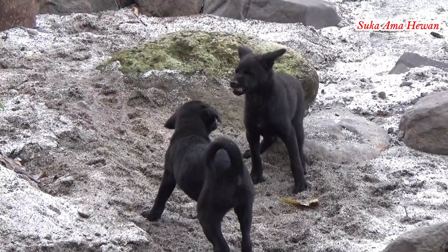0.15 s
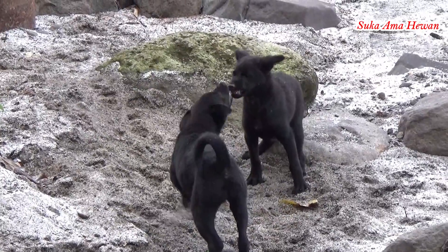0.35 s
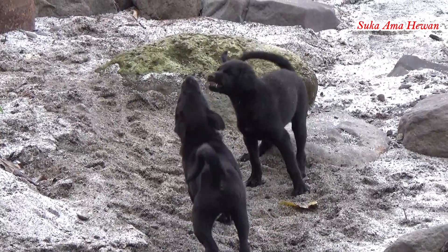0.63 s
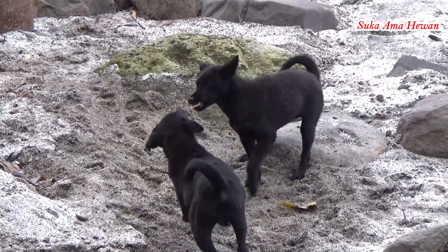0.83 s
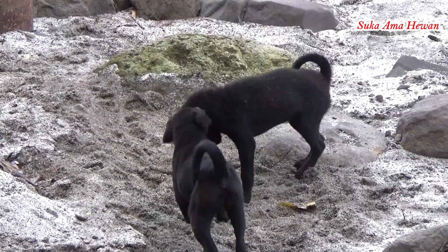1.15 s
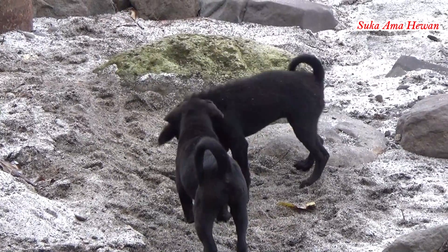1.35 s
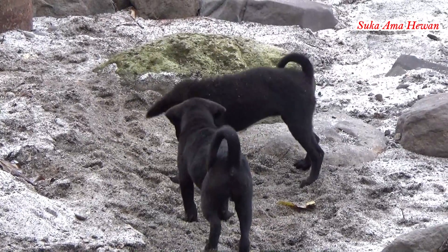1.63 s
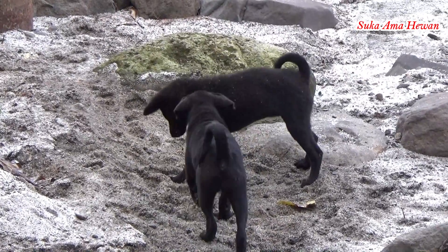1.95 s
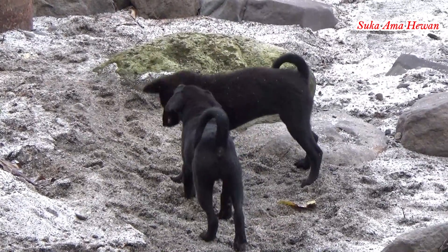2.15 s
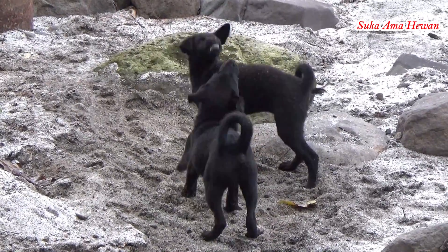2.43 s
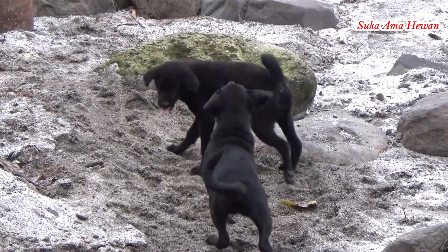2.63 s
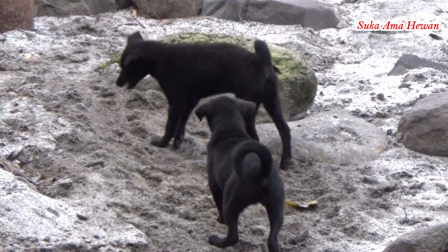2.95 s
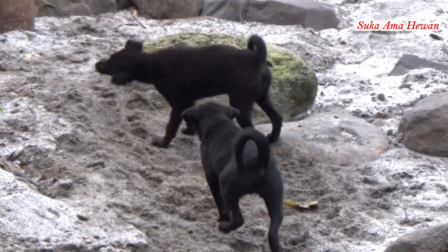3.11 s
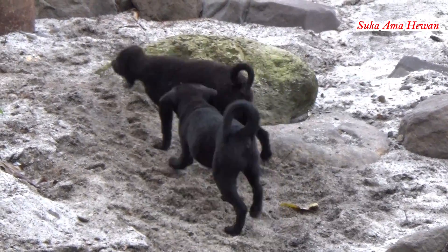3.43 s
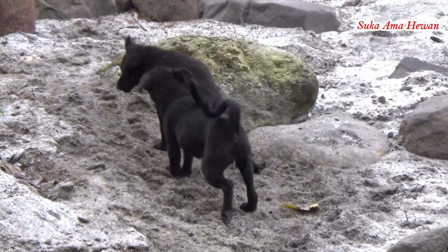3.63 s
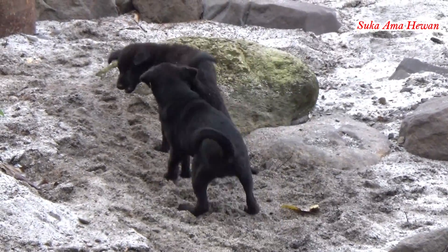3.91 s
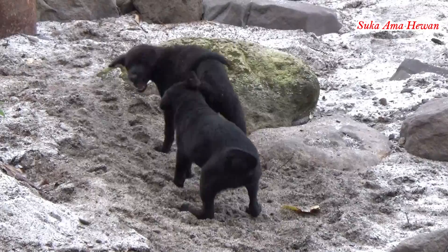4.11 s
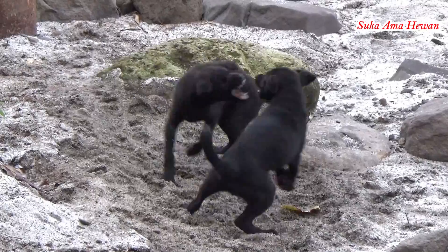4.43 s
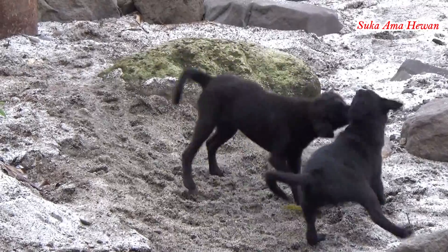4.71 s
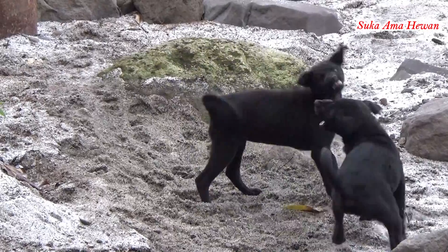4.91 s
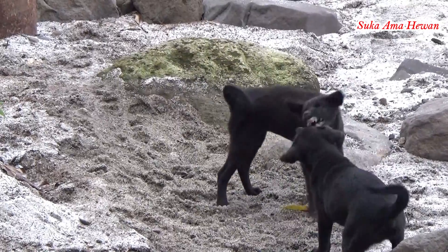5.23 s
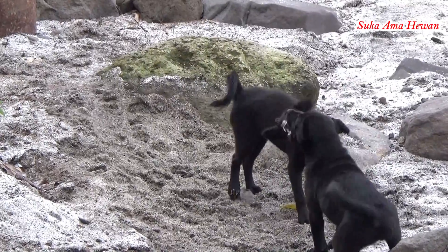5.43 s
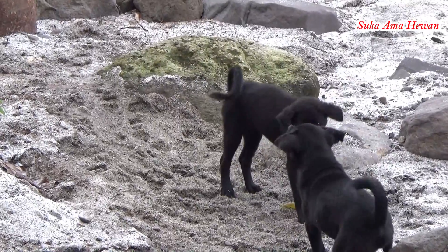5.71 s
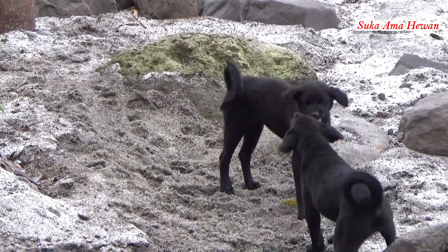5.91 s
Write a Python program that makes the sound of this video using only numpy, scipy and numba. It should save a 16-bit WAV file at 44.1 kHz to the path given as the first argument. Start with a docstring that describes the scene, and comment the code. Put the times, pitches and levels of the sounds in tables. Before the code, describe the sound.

Two young dogs play-fight outdoors, with short hoarse barks, soft uneven growls, tiny whimpers and faint paw scuffs on sand.

```python
"""On sandy ground among boulders, two young dogs play-fight a few metres away.
Slack vocal folds flap in slow, uneven growls; hard pushes of air drive five short, hoarse barks,
shaped by throat, jaw and lips. Thin whimpers slip in between, paws scuff, breath hisses, jaws snap.
The rocks throw back a short echo over a quiet outdoor hush."""
import sys
import numpy as np
from scipy import signal
from scipy.fft import rfft, irfft, next_fast_len
from scipy.io import wavfile
from scipy.ndimage import uniform_filter1d
from numba import njit

SR = 44100
rng = np.random.default_rng(int(sys.argv[2]) if len(sys.argv) > 2 else 0)


def to_wav(sig):
    """Store sig (one row per channel, or 1-D mono) as 16-bit WAV at the path in sys.argv[1].

    Samples outside -1..1 are clipped; the rate is SR.
    """
    pcm = np.clip(np.atleast_2d(sig), -1, 1) * 32767
    pcm = np.round(pcm).astype(np.int16)
    wavfile.write(sys.argv[1], SR, pcm.T)  # frames by channels


N = 267246
T = np.arange(N) / SR

# tone of the outdoor bed: f/Hz, level/dB
HUSH_SPECTRUM = [(25, -46), (55, -12.5), (100, -4.5), (170, 2), (280, -6.5), (700, -0.5), (1100, -3.5),
                 (4000, -9.5), (9000, -14), (15500, -21.5)]
# stereo width of hush and echo: f/Hz, side against mid/dB
DIFFUSE_WIDTH = [(180, -19.5), (700, -3.5), (5000, -5.5), (15000, -16)]
# returns from the rocks: delay/s, level/dB, t60/s
REFLECTIONS = [(0.001, -11, 0.21), (0.06, -21.5, 0.53), (0.058, -41, 0.56)]
# tone of the echo: f/Hz, gain/dB
ECHO_EQ = [(400, 10.5), (950, -3), (1850, -1), (3300, 6), (9000, 5.5)]
# tone of rubbing sand and the hiss above it: f/Hz, level/dB
SCRAPE_HISS_SPECTRUM = [(40, -44), (160, 1), (550, -8.5), (1300, 1.5), (2000, -1.5), (6500, -10.5),
                        (9700, -8), (15500, -30)]
# paw scrapes and breathy growl hiss: peak t/s, length/s, coarse sand level/dB,
# high hiss level/dB (fine sand or the growling dog's breath)
SCRAPE_HISS_CUES = [(-0.002, 0.23, -62, -67), (0.5, 0.15, -65, -68), (1.408, 0.17, -66.5, -64.5),
                    (2.423, .08, -61, -66.5), (2.683, 0.23, -65.5, -69), (3.685, 0.21, -64, -72),
                    (4.276, 0.096, -54.5, -65), (4.366, 0.067, -59, -69), (4.46, 0.2, -58.5, -75),
                    (4.64, 0.21, -67, -67.5), (4.741, 0.046, -61.5, -73), (5.017, 0.23, -65, -63),
                    (5.323, 0.12, -62, -62), (5.51, 0.21, -56, -65), (5.747, 0.08, -68, -63)]
# jaw snaps, spits of air through the teeth and kicked grit: t/s, level/dB, f/Hz, width/Hz, t60/s
SNAP_BURSTS = [(.459, -53.5, 8700, 3020, .03), (1.07, -55, 5120, 900, 0.11),
               (1.938, -52, 1790, 3520, 0.031), (2.38, -52, 1900, 1200, 0.032),
               (3.628, -55, 5070, 1100, 0.095), (4.304, -48.5, 10200, 2500, 0.026),
               (4.593, -52, 9600, 5000, 0.089), (4.732, -60, 3000, 7100, 0.089),
               (5.074, -50, 5760, 1500, 0.25)]
# whimpers: t/s, length/s, top pitch f/Hz, level/dB
WHIMPER_CUES = [(1.84, 0.058, 1010, -63), (1.899, 0.093, 1033, -65), (3.797, 0.087, 664, -70.5),
                (4.513, 0.025, 1026, -42), (4.557, .036, 1032, -48), (4.925, 0.0415, 1190, -41.5)]
# tone of the growling throat: f/Hz, gain/dB
GROWL_THROAT_EQ = [(60, -31), (160, -14), (390, -7), (530, -16), (780, -0.5), (1300, 1), (1500, -2.5),
                   (2000, -7.5), (2300, -14), (3000, -12), (3800, -28.5), (12000, -41)]
# growls: t/s, length/s, level/dB, mouth resonance f/Hz, upper resonance against it/dB
GROWL_CUES = [ (0.508, 0.057, -57.5, 1130, -11), (2.376, 0.039, -59.5, 1160, -4),
              (2.561, 0.094, -56, 1070, -10), (2.641, 0.069, -49, 876, -20),
              (2.697, 0.062, -48.5, 1100, -8), (2.75, 0.078, -57.5, 1044, -2),
              (3.607, .057, -44.5, 967, -11), (3.658, 0.12, -60, 1090, 8), (4.22, 0.25, -56.5, 1270, 7.5),
              (4.472, 0.14, -50.5, 1040, -7), (4.867, 0.079, -55.5, 1075, -13),
              (4.902, 0.095, -47, 1180, -1.5), (4.994, 0.086, -45.5, 1120, 1),
              (5.137, 0.186, -48, 1170, -3.5), (5.298, 0.058, -41, 1370, 2),
              (5.337, 0.057, -39.5, 1115, -0.5), (5.408, 0.17, -54, 1250, 5.5),
              (5.542, .115, -58, 1230, -2), ]
# tone of the barking throat: f/Hz, gain/dB
BARK_THROAT_EQ = [(60, -32), (400, -25.5), (590, -17.5), (850, 4), (1300, 4), (1480, 6.5), (1980, -8),
                  (2300, -11), (2900, -11), (3900, -21.5), (4700, -33.5), (7000, -37), (8200, -23.5),
                  (10000, -27), (15000, -56)]
# barks: t/s, length/s, level/dB, top pitch f/Hz, arch depth/octaves, apex/share of length,
# roughness/0-1, mouth resonance f/Hz, its fall as the jaw shuts/octaves, upper resonance f/Hz,
# its level/dB, lip resonance level/dB, hiss through the teeth/dB
BARK_CUES = [ (0.757, 0.087, -23, 466, 0.27, 0.58, 0.35, 980, 0.023, 1790, 7, 7, -6.5),
             (1.058, 0.086, -27.5, 432, 0.49, 0.65, 0.3, 1230, 0.67, 1917, 15.5, 10.5, 5),
             (2.412, 0.083, -24.5, 443, .27, .62, 0.5, 1085, 0.14, 1860, 3, -4, -5),
             (5.034, .099, -27, 373.4, .25, .74, .62, 1030, .06, 1910, 8.5, -42, -2.5),
             (5.81, .099, -20.5, 571.7, .74, .57, 0.33, 1170, .36, 1844, 8, -0.5, 0.5), ]


def undb(db):
    """Decibels to gain."""
    return 10 ** (np.asarray(db) / 20)


def unit(x):
    """Scale to rms 1."""
    return x / np.sqrt(np.mean(x ** 2) + 1e-18)


def steady(x, seconds):
    """Ride the short-term rms to 1, leaving faster pulsing alone."""
    window = int(seconds * SR)
    power = uniform_filter1d(uniform_filter1d(x ** 2, window), window)
    return x / np.sqrt(np.abs(power) + 1e-12)


def colour(x, points):
    """EQ along a curve of (f/Hz, gain/dB) points."""
    hz, db = np.transpose(points)
    size = next_fast_len(x.shape[-1])
    f = np.maximum(np.fft.rfftfreq(size, 1 / SR), 1)
    gain = undb(np.interp(np.log(f), np.log(hz), db))
    return irfft(rfft(x, size) * gain, size)[..., :x.shape[-1]]


def walk(t, rate):
    """Random wander with a spread near 1, at `rate` steps a second."""
    steps = rng.standard_normal(4096)
    return np.interp((t - t[0]) * rate, np.arange(len(steps)), steps)


def stretch(start, length):
    """Sample indices of an event and its age in seconds."""
    span = np.arange(int(start * SR), min(int((start + length) * SR), N))
    return span, (span - span[0]) / SR


def ramp(age, seconds):
    """A smooth fade from 0 to 1."""
    return np.sin(np.pi / 2 * np.clip(age / seconds, 0, 1)) ** 2


def decay(age, t60):
    """An exponential tail, 60 dB down after t60 seconds."""
    return np.exp(-np.log(1000) * age / t60)


@njit
def bandpass(x, hz, width):
    """State-variable band-pass with a moving centre."""
    y, band_state, low_state = np.empty(len(x)), 0., 0.
    for i in range(len(x)):
        tuning, damping = np.tan(np.pi * hz[i] / SR), width / hz[i]
        band = (band_state + tuning * (x[i] - low_state)) / (1 + tuning * (tuning + damping))
        band_state = 2 * band - band_state
        low_state += 2 * tuning * band
        y[i] = damping * band
    return y


def resonance(x, hz, width):
    """Two band-passes in series, for steep flanks."""
    centre = hz + np.zeros(len(x))
    return bandpass(bandpass(x, centre, float(width)), centre, float(width))


def widen(mid, side):
    """Mid and side to stereo, nearly mono in the bass."""
    return mid + colour(side, DIFFUSE_WIDTH) * np.array([[1], [-1]])


def hush(level_db=-64, sway_db=.3):
    """A bed of distant outdoor noise whose level barely sways."""
    mid, side = (unit(colour(rng.standard_normal(N), HUSH_SPECTRUM)) for _ in range(2))
    return widen(mid, side) * undb(level_db + sway_db * walk(T, 2.6))


def rock_echo(x, side_db=-1):
    """Dense scatter off the nearby boulders, a later bounce from a bank of stones, a faint tail."""
    age = np.arange(SR) / SR
    power = sum((undb(db) * unit((age > delay) * decay(age, t60))) ** 2
                for delay, db, t60 in REFLECTIONS)
    impulses = (np.sqrt(power / SR) * colour(rng.standard_normal(SR), ECHO_EQ) for _ in range(2))
    mid, side = (signal.fftconvolve(x, impulse)[:N] for impulse in impulses)
    return widen(mid, undb(side_db) * side)


def scrapes_and_hiss(grains_per_s=5000, spread_db=3.5, flicker_db=2, edge_db=-8.5):
    """Grainy swells: paws scrape coarse sand under a high hiss of fine sand or a growling dog's breath."""
    ticks = (rng.random(N) < grains_per_s / SR) * rng.standard_normal(N)
    sizes = undb(spread_db * np.minimum(rng.exponential(size=N), 4))
    texture = steady(colour(ticks * sizes, SCRAPE_HISS_SPECTRUM), .04)
    highs = colour(texture, [(3500, -30), (7500, 0)])
    # scrape and hiss flicker independently
    scrape, hiss = (unit(band) * undb(flicker_db * walk(T, 45)) for band in (texture - highs, highs))
    out = np.zeros(N)
    for peak_s, length, scrape_db, hiss_db in SCRAPE_HISS_CUES:
        envelope = undb(edge_db * np.abs(T - peak_s) / (length / 2))
        out += (scrape * undb(scrape_db) + hiss * undb(hiss_db)) * envelope
    return out


def snaps(rise_share=.042):
    """Jaws, spits of air and kicked grit: quick noise bursts, the longer ones softer in attack."""
    out = np.zeros(N)
    age = np.arange(SR // 8) / SR
    for start, db, hz, width, t60 in SNAP_BURSTS:
        noise = unit(resonance(rng.standard_normal(len(age)), hz, width))
        first = int(start * SR)
        out[first:first + len(age)] += noise * undb(db) * ramp(age, rise_share * t60) * decay(age, t60)
    return out


def whimpers(arch_octaves=.106, wobble=.018):
    """Thin, nearly pure tones through a closed mouth, each a small arch in pitch."""
    out = np.zeros(N)
    for start, length, top_hz, db in WHIMPER_CUES:
        span, age = stretch(start, length)
        arch = 2 ** (-arch_octaves * (2 * age / length - 1) ** 2)
        hz = top_hz * arch * (1 + wobble * walk(age, 240))
        tone = unit(np.sin(2 * np.pi * np.cumsum(hz) / SR))
        out[span] += tone * undb(db) * signal.windows.tukey(len(span), .6)
    return out


def folds(t, hz, rough, jitter, shimmer, air, open_share, soft_hz):
    """Vocal folds: a pulse and a puff of turbulence each cycle, uneven in time and size when rough."""
    cycles = np.cumsum(hz * np.exp(jitter * rough * walk(t, np.mean(hz)))) / SR
    count, phase = cycles.astype(int), cycles % 1
    size = undb(shimmer * rough * rng.standard_normal(512)[count])
    pulses = unit(np.sinc((phase - .5) * SR / hz) * size)
    airflow = np.exp(-((phase - .5) % 1) / open_share)
    puffs = unit(rng.standard_normal(N)[:len(t)] * airflow * size)
    # the folds close softly: high up, turbulence takes over from the pulses
    clear = colour(pulses, [(soft_hz, 0), (2 * soft_hz, -14)])
    breathy = colour(puffs, [(soft_hz / 2, -20), (soft_hz, -12), (1.5 * soft_hz, -2)])
    return (1 - rough) * (clear + breathy) + air * rough * puffs


def mouth(source, throat_eq, mouth_hz, upper_hz, upper_db, width_hz, boost_db):
    """The tone of the throat, lifted at two resonances of the open mouth."""
    voice = colour(source, throat_eq)
    lift = resonance(voice, mouth_hz, width_hz) + undb(upper_db) * resonance(voice, upper_hz, width_hz)
    return voice + undb(boost_db) * lift


def growls(pulse_hz=110, upper_hz=1880, jaw_wander=.11, attack_s=.018, release_s=.023):
    """Slack folds flap slowly and unevenly behind bared teeth, in short pushes."""
    out = np.zeros(N)
    for start, length, db, open_hz, upper_db in GROWL_CUES:
        span, age = stretch(start - attack_s / 4, length + release_s / 2)
        hz = pulse_hz * np.exp(.2 * walk(age, 20))
        source = folds(age, hz, rough=.6, jitter=.45, shimmer=3, air=1.1, open_share=.8, soft_hz=1690)
        # the jaw wavers; the upper resonance moves with it, half as far
        jaw = np.exp(jaw_wander * walk(age, 21.5))
        voice = mouth(source, GROWL_THROAT_EQ, open_hz * jaw, upper_hz * np.sqrt(jaw), upper_db,
                      width_hz=340, boost_db=8)
        fades = ramp(age, attack_s) * ramp(age[-1] - age, release_s)
        out[span] += steady(voice, .035) * undb(db) * fades
    return out


def air_push(age, length, release_s, start_db=-16.5, swell_s=.04, sag_db=-2, sag_s=.038,
             release_db=-11, tail_db_per_s=330):
    """Force of the air behind a bark in dB: it starts weak, swells, holds, sags and gives out."""
    past_end = age - length
    swell = start_db * np.maximum(1 - age / swell_s, 0)
    sag = sag_db * ramp(past_end + sag_s, sag_s)
    release = release_db * ramp(past_end + release_s / 2, release_s)
    return swell + sag + release - tail_db_per_s * np.maximum(past_end, 0)


def barks(attack_s=.0071, release_s=.017, tail_s=.045, arch_power=1.5, soft_rough_share=.73,
          slack_upper_db=-5.5, lips_hz=(4000, 2500), shut_db=-7, open_s=.028, chest_db=-50):
    """Each bark swells, arches in pitch and rasps at full force; the jaw shuts as the air gives out."""
    out = np.zeros(N)
    for (start, length, level_db, top_hz, arch_octaves, apex, rough,
         open_hz, jaw_fall, upper_hz, upper_db, lips_db, teeth_db) in BARK_CUES:
        span, age = stretch(start, length + tail_s)
        push_db = air_push(age, length, release_s)
        # slack is 0 at the top of the pitch arch and about 1 at its feet
        slack = np.tanh(np.abs(age / (apex * length) - 1) ** arch_power) / np.tanh(1)
        hz = top_hz * 2 ** (-arch_octaves * slack)
        rasp = np.clip(rough * (soft_rough_share + (1 - soft_rough_share) * undb(push_db)), 0, 1)
        source = folds(age, hz, rasp, jitter=.08, shimmer=4, air=1.2, open_share=.55, soft_hz=2700)
        mouth_hz = open_hz * 2 ** (-jaw_fall * ramp(age - length / 2, length * .68))
        voice = mouth(source, BARK_THROAT_EQ, mouth_hz, upper_hz, upper_db + slack_upper_db * slack,
                      width_hz=400, boost_db=3)
        voice = steady(voice, .0058)
        # the lips close over the teeth, so their resonance falls
        voice += undb(lips_db) * resonance(voice, np.linspace(*lips_hz, len(span)), width=1200)
        voice = colour(voice, [(6000, 0), (8000, teeth_db)])
        # the overtones come in as the mouth opens; a harder push brightens the treble
        opening = undb(shut_db * (1 - ramp(age, open_s)))
        effort = undb(.1 * push_db)
        voice += colour(voice, [(1100, -30), (1700, 0)]) * (opening - 1)
        voice += colour(voice, [(1900, -30), (2700, 0)]) * (effort - 1)
        # the chest resonates with the fundamental, which swells and fades more slowly
        fundamental = np.sin(2 * np.pi * np.cumsum(hz) / SR)
        chest = resonance(fundamental, hz=376, width=120) * undb(chest_db)
        chest *= effort * opening * (1 - rasp)
        fades = ramp(age, attack_s) * ramp(age[-1] - age, release_s)
        out[span] += (voice * undb(level_db + push_db) + chest) * fades
    return out


def scene():
    """The dogs dead centre, their echo and the hush spread around them."""
    dogs = barks() + growls() + whimpers() + scrapes_and_hiss() + snaps()
    return dogs + rock_echo(dogs) + hush()


def record(dry, low_cut_hz=45, high_cut_hz=15500):
    """Roll off the rumble and cut the very top steeply."""
    low_cut = signal.butter(2, low_cut_hz, "high", fs=SR, output="sos")
    high_cut = signal.ellip(10, .1, 70, high_cut_hz, fs=SR, output="sos")
    return signal.sosfilt(high_cut, signal.sosfilt(low_cut, dry))


dry = scene()
out = record(dry)
to_wav(out)
```